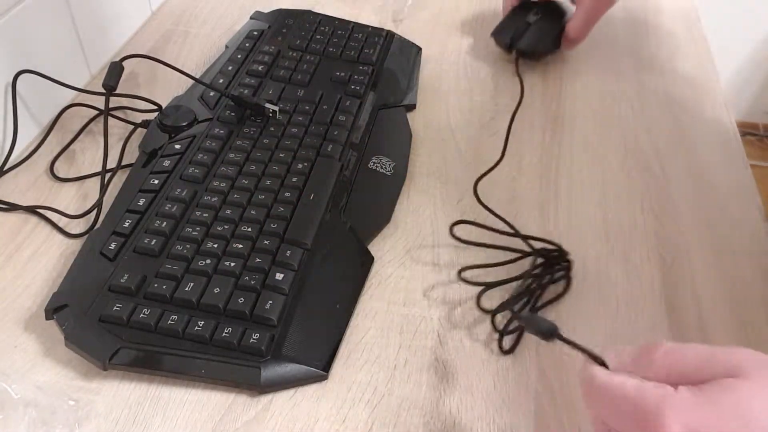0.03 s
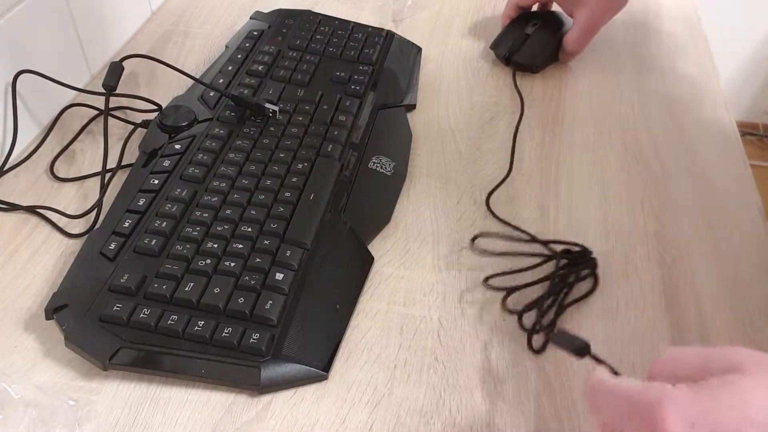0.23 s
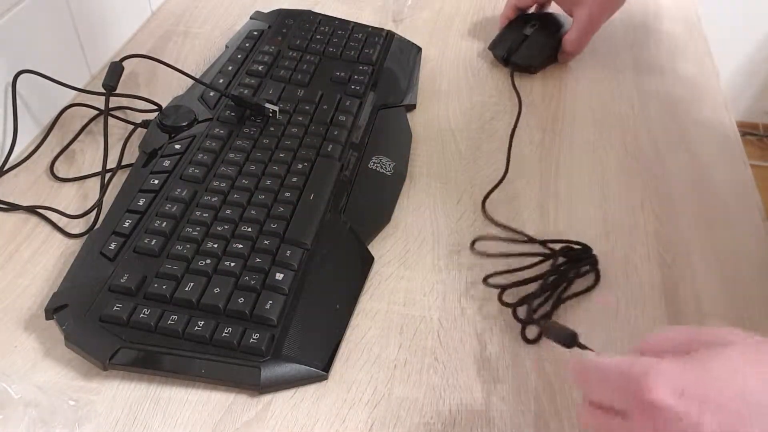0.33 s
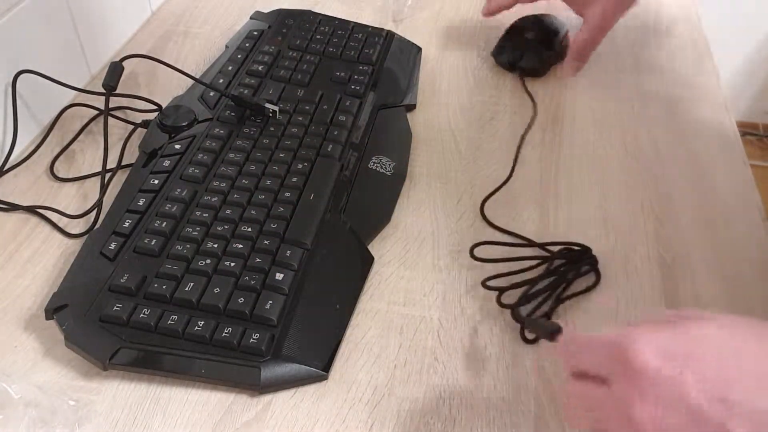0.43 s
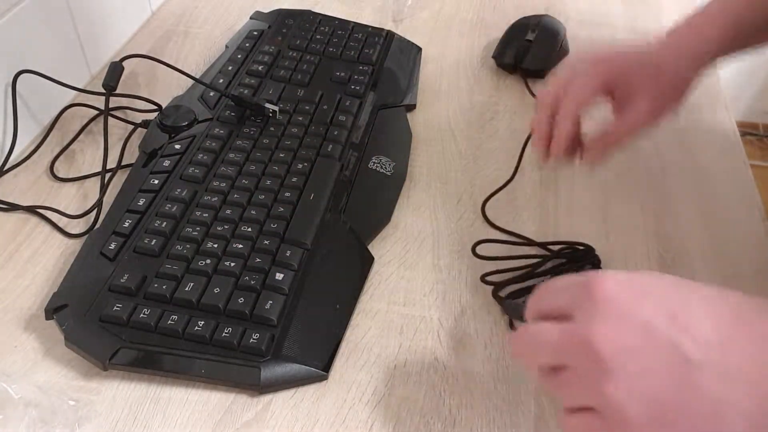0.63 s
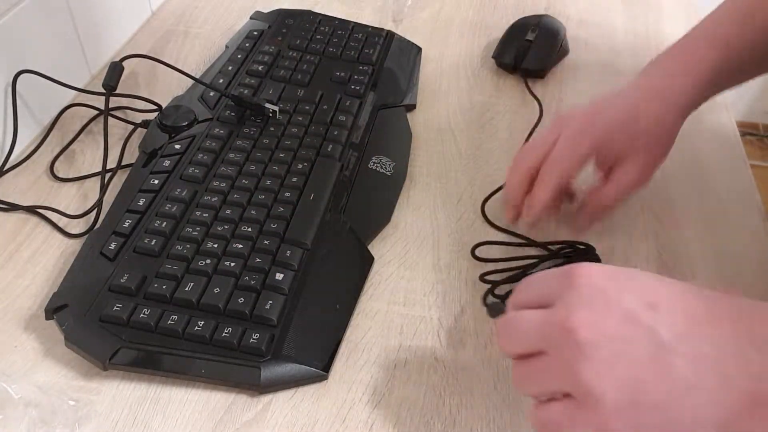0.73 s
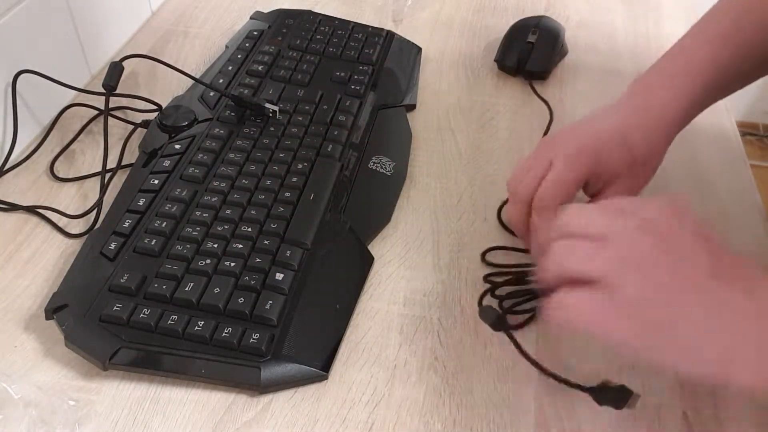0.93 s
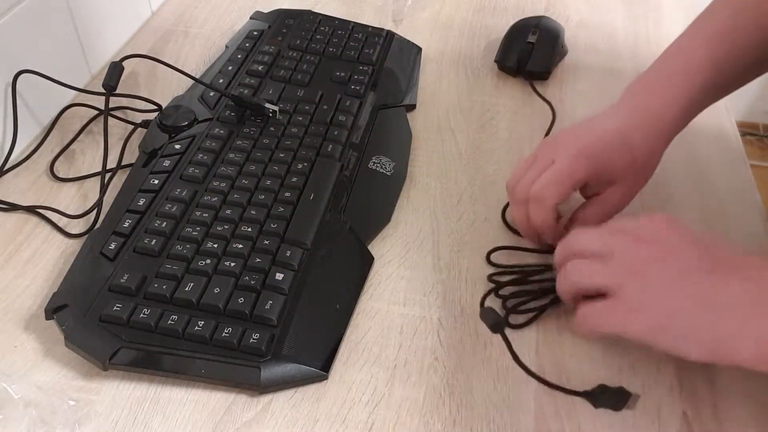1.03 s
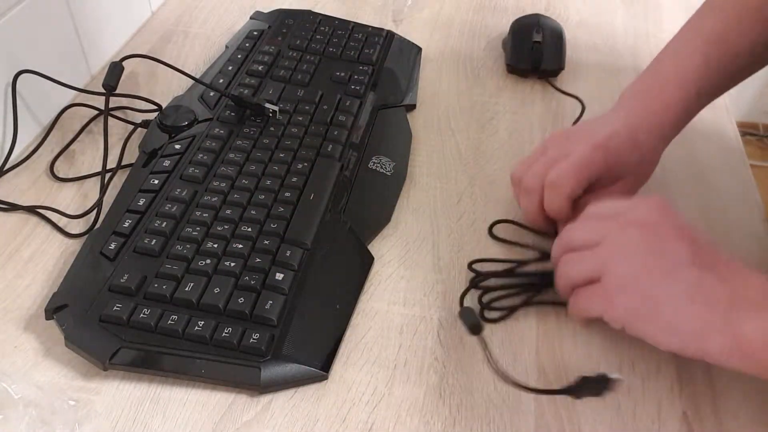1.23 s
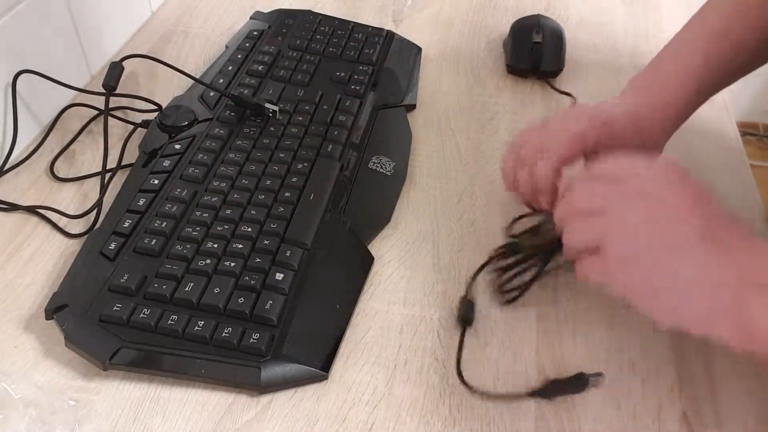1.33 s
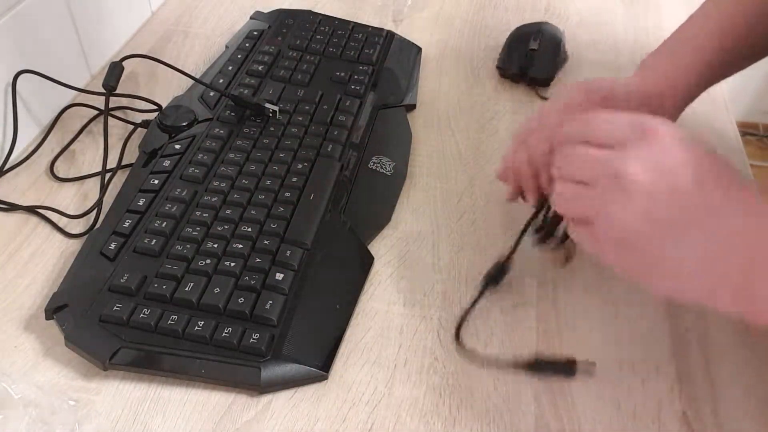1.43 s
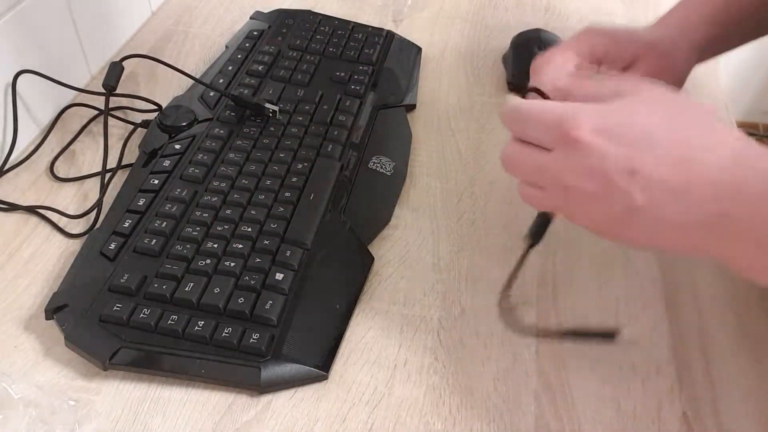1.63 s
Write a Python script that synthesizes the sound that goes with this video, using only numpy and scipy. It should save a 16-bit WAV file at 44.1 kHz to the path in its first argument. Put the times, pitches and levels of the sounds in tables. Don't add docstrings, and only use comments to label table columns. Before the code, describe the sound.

Two woody knocks of a mouse on a desk, then bright little plug ticks, short cable drags and a second rattle, ending in faint rubbing and light taps, picked up closely indoors with low hum and hiss.

```python
import sys
import numpy as np
from scipy import signal
from scipy.fft import rfft, irfft, next_fast_len
from scipy.io import wavfile
from scipy.ndimage import uniform_filter1d, map_coordinates

SR = 44100
rng = np.random.default_rng(int(sys.argv[2]) if len(sys.argv) > 2 else 0)


def waveform_to_disk(signal):
    frames = np.transpose(np.atleast_2d(signal))
    scaled = np.clip(frames, -1, 1) * 32767
    samples = np.round(scaled).astype(np.int16)
    wavfile.write(sys.argv[1], SR, samples)


def ratio(d):
    e = np.asarray(d, float) / 20
    return 10 ** e


N = 74970
PAD = SR // 10
TIME = (np.arange(N + PAD) - PAD) / SR


def colour(x, points):
    n = next_fast_len(x.shape[-1] + 4096)
    hz, db = np.array(points, float).T
    f = np.arange(n // 2 + 1) * SR / n
    gain = ratio(np.interp(np.log(f + 1), np.log(hz), db))
    return irfft(rfft(x, n) * gain, n)[..., :x.shape[-1]]


def unit(x):
    return x / np.sqrt(np.mean(x ** 2))


def decay(t, t60):
    return np.exp(-np.log(1000) * t / t60)


def add(out, x, s):
    i = int(round(s * SR)) + PAD
    out[i:i + len(x)] += x[:len(out) - i]


def swell(s, db):
    return ratio(np.interp(TIME, s, db, -200, -200))


def ring(modes, favour_hz=None, damp=0.53):
    scatter_db, detune, favour_octaves, contact_s = 1.5, .008, .7, 0.00087
    hz, db, t60 = np.array(modes, float).T[:, :, None]
    t = np.arange(SR // 3) / SR
    chance = rng.standard_normal((len(hz), 2))
    hz = hz * (1 + detune * chance[:, :1])
    gain = ratio(db + scatter_db * chance[:, 1:])
    gain = gain * (-1.) ** np.arange(len(hz))[:, None]
    if favour_hz:
        gain = gain / (1 + (np.log2(hz / favour_hz) / favour_octaves) ** 2)
    build_up = 1 - np.exp(-t / contact_s)
    fade = decay(t, np.clip(t60 * damp, .001, .2)) * build_up
    return (gain * np.sin(2 * np.pi * hz * t) * fade).sum(0) / 2


def crack(t60):
    t = np.arange(SR // 3) / SR
    return rng.standard_normal(len(t)) * decay(t, t60) * (1 - np.exp(-t / 0.00007))


def pair(n):
    alike_hz = 308
    mid, side = rng.standard_normal((2, n))
    side = colour(side, [(alike_hz / 6, -14), (alike_hz, -5), (alike_hz * 3, 0)])
    return np.array([mid + side, mid - side])


# f/Hz, rms level/dB
HUM = [(49.6, -66), (100, -77)]
# f/Hz, density/dB per Hz
FLOOR = [(30, -8.5), (60, -12), (120, -16.5), (300, -27), (1000, -28), (3000, -37.5), (8000, -51),
         (16000, -35.5)]


def background():
    hiss_db = -72.5
    sway_db = unit(uniform_filter1d(rng.standard_normal(len(TIME)), 6000))
    hum = 0
    for hz, db in HUM:
        hum = hum + ratio(db + 3.5 + sway_db) * np.sin(2 * np.pi * hz * TIME + 0.5)
    return hum + ratio(hiss_db) * unit(colour(pair(len(TIME)), FLOOR))


# f/Hz, level/dB, T60/s
DESK = [(171, -5.5, 0.096), (288.3, -6.5, 0.09), (440, -5, 0.026), (527.1, -1, 0.086), (652, -12, 0.072),
        (806.3, -2.5, 0.056), (960, -1.5, 0.024), (1048, -5.5, 0.039), (1145, -4.5, 0.04),
        (1422, -10.5, 0.05), (1565, -12, 0.026), (1730, -30, 0.047), (2240, 5, 0.022), (2860, -16, 0.04)]
# t/s, level/dB,
# favoured f/Hz, crack level/dB
KNOCKS = [(-.03, -37, 1000, -2), (.010, -52, 670, -9), (0.026, -44, 1620, -3.5), (0.239, -29.5, 1000, -4),
          (0.2461, -30, 470, -10), (.255, -38.5, 865, -29), (0.416, -42, 900, -8.5),
          (0.425, -18, 1110, -10.5), (0.428, -26.5, 1200, -16), (.434, -28, 293, -26.5),
          (0.441, -29, 900, -37), (0.449, -36, 610, -38), (0.463, -35, 710, -12), (.53, -44, 640, -10),
          (1.222, -45.5, 440, -30), (1.245, -47, 475, -30), (1.296, -47.5, 500, -30),
          (1.4418, -36, 2000, -4), (1.4469, -36.5, 1105, -14), (1.597, -46.5, 520, -32)]


def mouse():
    out = np.zeros(len(TIME))
    for s, db, hz, crack_db in KNOCKS:
        snap = colour(crack(0.028), [(300, -11), (1200, 12.0), (3500, 1.0), (8000, -8.5), (16000, -18)])
        blow = ring(DESK, hz, damp=.7) * 2 + ratio(crack_db) * snap
        add(out, ratio(db) * blow, s)
    return out


# f/Hz, level/dB, T60/s
THUMP_MODES = [(53.7, -8, 0.058), (93.7, 0.5, 0.13), (185, -1.5, 0.1)]
# t/s, level/dB
THUMPS = [
    (0.243, -43.5),
    (0.427, -33.5),
    (0.721, -47),
    (0.841, -37.5),
    (0.854, -44),
    (0.893, -69),
    (1.116, -47),
    (1.134, -73),
    (1.36, -50.5),
]


def thumps():
    out, contact = np.zeros(len(TIME)), np.hanning(200)
    for s, db in THUMPS:
        blow = np.convolve(ring(THUMP_MODES), contact / contact.sum())
        add(out, ratio(db) * 3 * blow, s)
    return out


# f/Hz, level/dB, T60/s
PLUG = [(1200, 1.5, 0.0086), (1574, -3, 0.035), (1945, 3.5, 0.034), (2132, -0.5, 0.039), (2370, 1, 0.021),
        (2640, 9, 0.013), (3370, 1, 0.016), (3600, 1.5, 0.012)]
PLUG_BRIGHT = [(4750, -18, 0.00363), (5950, -17, 0.004), (6260, 13.5, 0.0061), (6420, 2, 0.0032),
               (7320, 12.5, 0.0056), (9600, -5.5, 0.0018), (13000, -23, .003)]
# t/s, level/dB, bright ring level/dB, desk level/dB
TICKS = [(0.7068, -21, -5, 0.5), (0.711, -29, 0.5, -2), (0.7182, -17.5, -10.5, -3.5),
         (0.7284, -33.5, -30, 11), (0.7398, -30.5, -22, 8), (.7525, -28, -23, -2), (.782, -35, -32, 11),
         (0.788, -27, -37, -12), (.795, -43, -12, -8), (0.805, -33.5, -7, 2), (.8375, -32, 0, 0),
         (.878, -36, -16, 4), (0.896, -35.5, -20, 10.5), (1.113, -31.5, 4.5, -17), (1.119, -46.5, -7.5, 16),
         (1.159, -35, -30, 3), (1.2415, -43.5, -4, 8), (1.2605, -36, -15, -21), (1.266, -31.5, -3.5, -0.5),
         (1.291, -38, -18, -10), (1.299, -35, -12, 8), (1.313, -50, -17, -11), (1.324, -44, -13, -8),
         (1.3587, -23.5, -18, 4), (1.3632, -26.5, 1.5, -16), (1.373, -45, -21, 17.5),
         (1.380, -50.5, -15, 28.5), (1.3675, -25, -22, 7.5)]


def plug():
    out = np.zeros(len(TIME))
    for s, db, bright_db, desk_db in TICKS:
        tick = colour(crack(0.014), [(1500, 5), (3800, 7), (5000, 0.5), (6300, 5), (8000, -3.5), (15000, -20.5)])
        bright = 0.62 * ring(PLUG_BRIGHT) + 0.55 * tick
        desk = ring(DESK, 1335, 0.26) * 2
        add(out, ratio(db) * (ring(PLUG) + ratio(bright_db) * bright + ratio(desk_db) * desk), s)
    return out


# t/s, force level/dB, bright level/dB
DRAG = [
    [(.709, -100, -14), (.725, -46, -52), (.78, -54, -22), (.83, -49.5, -31), (.885, -49.5, -19),
     (.915, -68, -20), (.94, -107, -34)],
    [(1.11, -55.5, -41), (1.13, -58, -28), (1.17, -63.5, -34), (1.203, -63, -30)],
    [(1.2, -75, -12), (1.214, -50.5, 3.5), (1.225, -54.5, -11), (1.24, -53, -17), (1.266, -45.5, -9),
     (1.28, -51, -12), (1.305, -44, -13), (1.33, -58, -11), (1.357, -74, -25)],
    [(1.36, -90, 13), (1.385, -99, -23), (1.43, -84, -11), (1.50, -108, 17), (1.6, -67, -19),
     (1.66, -89, 13)],
]
DRAG_DESK_DB = [2, 3.5, -7.5, -12]
# f/Hz, level/dB
SHEATH = [(700, -25.5), (1400, 0.5), (1900, 7), (2400, 6), (2900, 0.5), (3600, -5.5), (4600, -29)]


def drag():
    grains_per_s, grain_scatter_db = 4700, 3
    force, low, bright = np.zeros((3, len(TIME)))
    for rows, desk_db in zip(DRAG, DRAG_DESK_DB):
        s, db, bright_db = np.array(rows, float).T
        force = force + swell(s, db)
        low = low + swell(s, db + desk_db)
        bright = bright + swell(s, db + bright_db)
    chance, size, sign = rng.random((3, len(TIME)))
    grain_db = np.minimum(-grain_scatter_db * np.log(size), 11)
    grains = unit((chance < grains_per_s / SR) * ratio(grain_db) * np.sign(sign - .5))
    desk_ring = ring(DESK, 1270, 0.09)
    desk_ring = desk_ring / np.sqrt(np.sum(desk_ring ** 2))
    desk = signal.fftconvolve(grains * low, desk_ring)[:len(TIME)]
    fizz = colour(grains * bright, [(2500, 1.5), (3600, 15), (5000, 4.0), (7500, 5.5), (9500, -5.5), (15000, -14)])
    return colour(grains * force, SHEATH) * 3 + desk + fizz


# t/s, hiss level/dB, desk murmur level/dB
RUB = [(.9, -104, -83), (0.972, -75, -58), (1.05, -94, -80.5), (1.15, -93, -85), (1.232, -59, -68),
       (1.3, -78, -54.5), (1.4, -66.5, -54), (1.472, -65, -54.5), (1.548, -63.5, -58.5),
       (1.6, -64.5, -64.5), (1.663, -72.5, -66), (1.7, -70, -77)]


def rub():
    s, hiss_db, low_db = np.array(RUB, float).T
    skin, wood = rng.standard_normal((2, len(TIME)))
    flutter = ratio(0.97 * unit(uniform_filter1d(rng.standard_normal(len(TIME)), 700)))
    hiss = unit(colour(skin, [(1125, -10), (4500, -1), (9000, -3), (14000, -1)]))
    low = unit(colour(wood, [(80, -12), (155, -1), (250, -6), (450, 0), (900, -3), (3000, -20), (8000, -45)]))
    return hiss * swell(s, hiss_db) + flutter * low * swell(s, low_db)


# f/Hz, T60/s
ROOM_T60 = [(60, 0.65), (200, 0.37), (500, 0.19), (1500, 0.25), (4000, 0.22), (12000, 0.19)]


def room():
    gap_s = .004
    fine_hz, broad_hz = 70, 900
    t = np.arange(SR * 2 // 3) / SR
    f, t60 = np.array(ROOM_T60).T
    noise, tail = pair(len(t)), 0
    for hz in 40 * 2. ** np.arange(9):
        band = colour(noise, [(hz / 2, -40), (hz / 1.4, -3), (hz, 0), (hz * 1.4, -3), (hz * 2, -40)])
        tail = tail + band * decay(t, np.interp(np.log(hz), np.log(f), t60))
    tail = tail * np.clip(t / gap_s - .5, 0, 1)
    spec = rfft(tail, SR)
    fine, broad = (uniform_filter1d(np.abs(spec) ** 2, width) for width in (fine_hz, broad_hz))
    tail = irfft(spec * np.sqrt(broad / fine), SR)[:, :len(t)]
    return tail / np.sqrt(np.sum(tail ** 2) / 2)


# f/Hz, level/dB
ROOM_COLOUR = [(100, 2.5), (500, 2), (1200, 4.5), (2100, 5.5), (3200, 2.5), (5000, 3), (8000, 2),
               (13000, 9)]
# f/Hz, right above left/dB
RIGHT = [(100, 5.5), (1000, 3), (3000, 4), (6000, 3.5), (14000, 1)]


def scene():
    room_db, left_lag_s = -5.5, 0.00007
    plug_room_db = -3.5
    echoes, quiet = room(), background()
    far = mouse() + thumps() + drag() + rub()
    near = plug()
    direct = far + near
    sent = colour(far + ratio(plug_room_db) * near, ROOM_COLOUR)
    wet = signal.fftconvolve(sent[None], echoes, axes=1)[:, :len(direct)]
    late = map_coordinates(direct, [np.arange(len(direct)) - left_lag_s * SR])
    left, right = np.array([late, direct]) + ratio(room_db) * wet + quiet
    half = np.array(RIGHT) * [1, .5]
    return np.array([colour(left, half * [1, -1]), colour(right, half)])[:, PAD:]


def band_limit(x):
    return signal.sosfilt(signal.butter(12, 16770, fs=SR, output="sos"), x)


# f/Hz, level/dB
MIC = [(30, -13), (48, 4), (300, 5), (2000, -0.45), (5000, 4), (6500, 9.5), (9000, 4), (15000, 1.5)]


def record(dry):
    top_hz = 15750
    top_cut = signal.ellip(6, .3, 35, top_hz, fs=SR, output="sos")
    return band_limit(signal.sosfilt(top_cut, colour(dry, MIC)))


dry = scene()
out = record(dry)
waveform_to_disk(out)
```